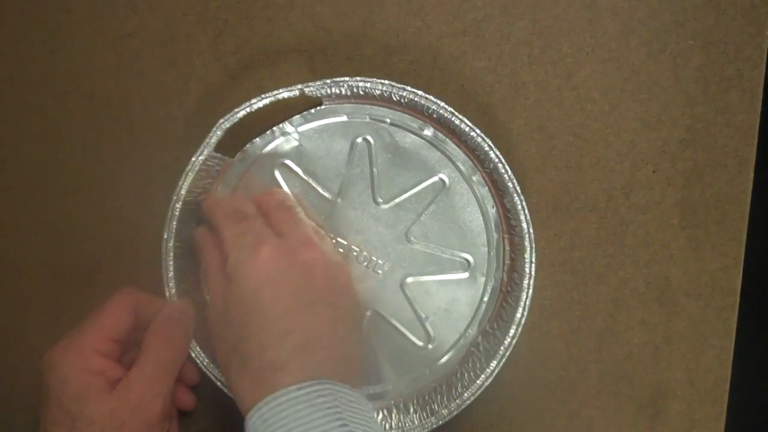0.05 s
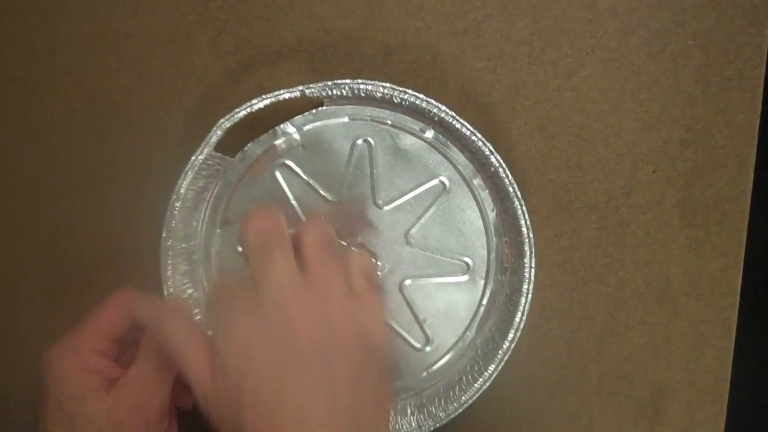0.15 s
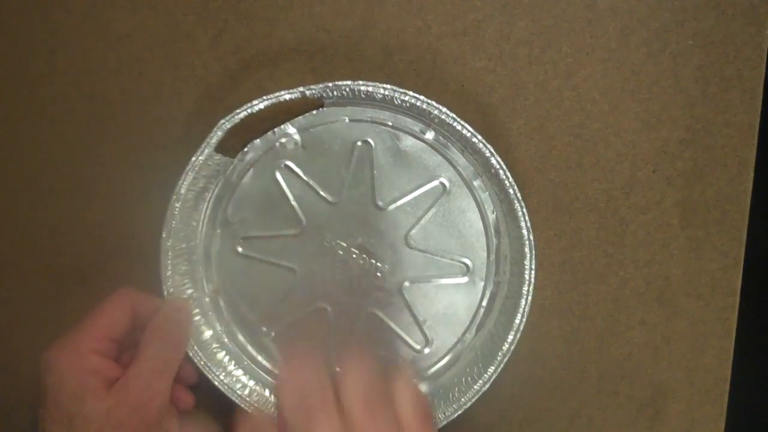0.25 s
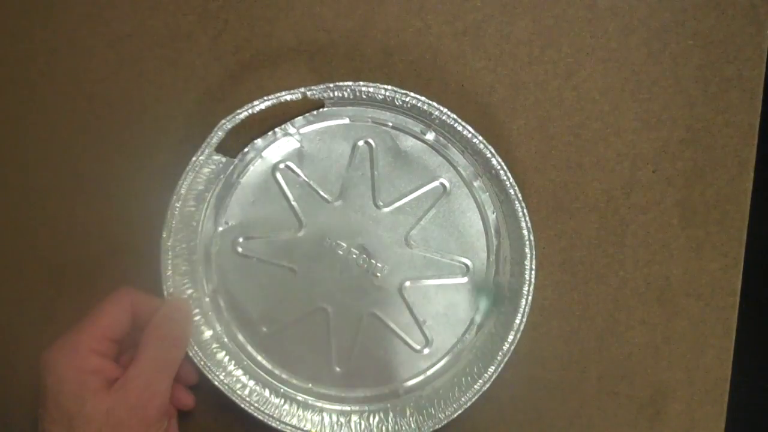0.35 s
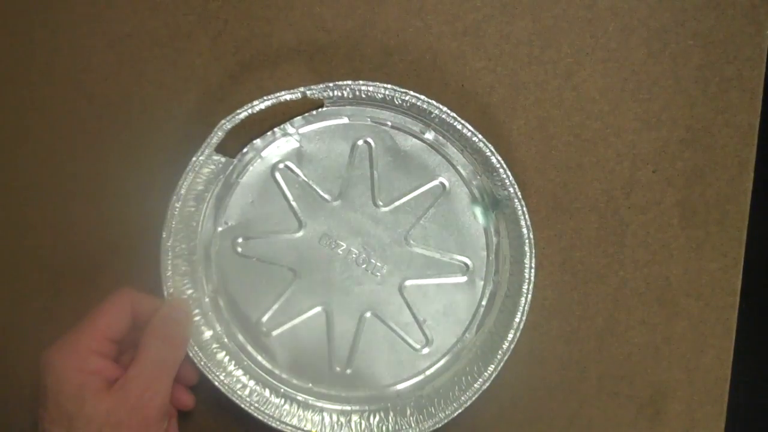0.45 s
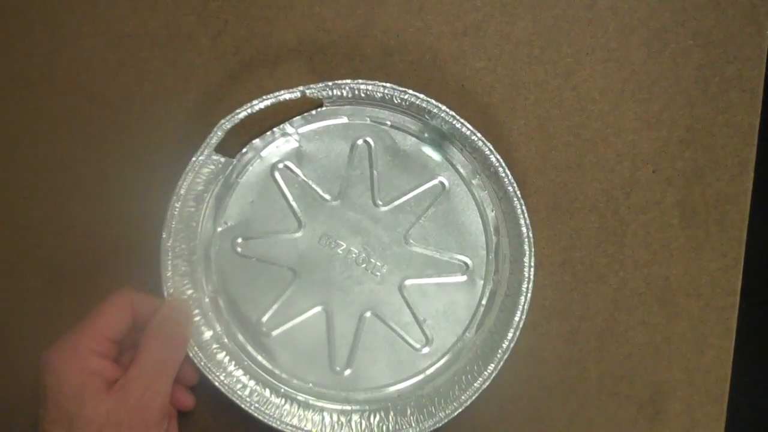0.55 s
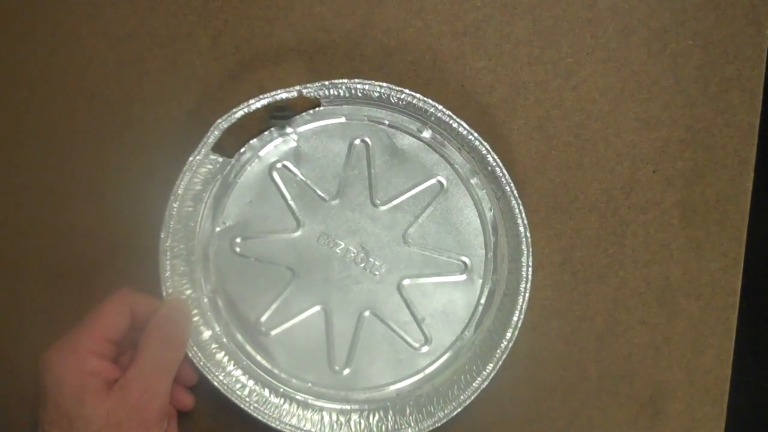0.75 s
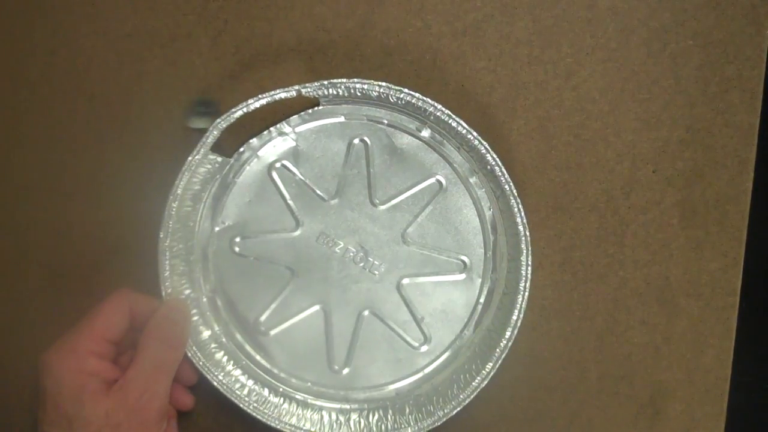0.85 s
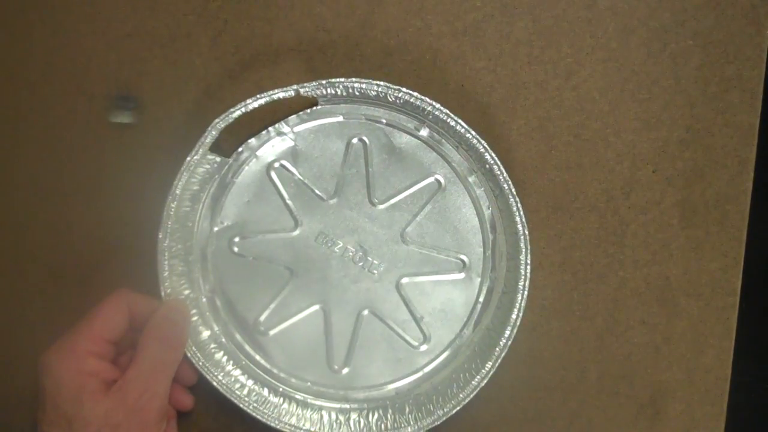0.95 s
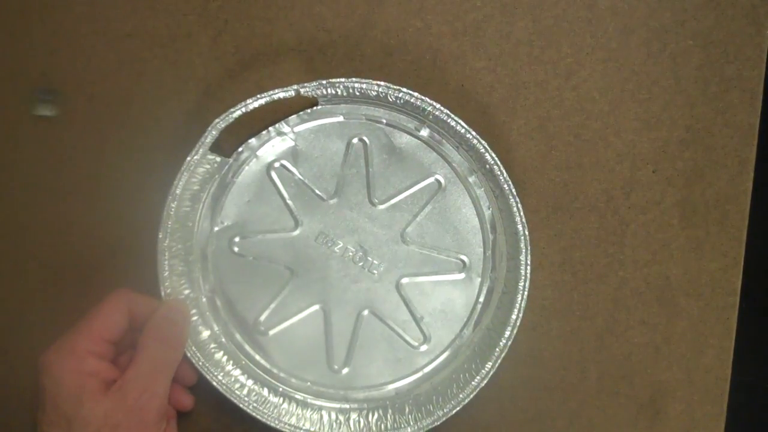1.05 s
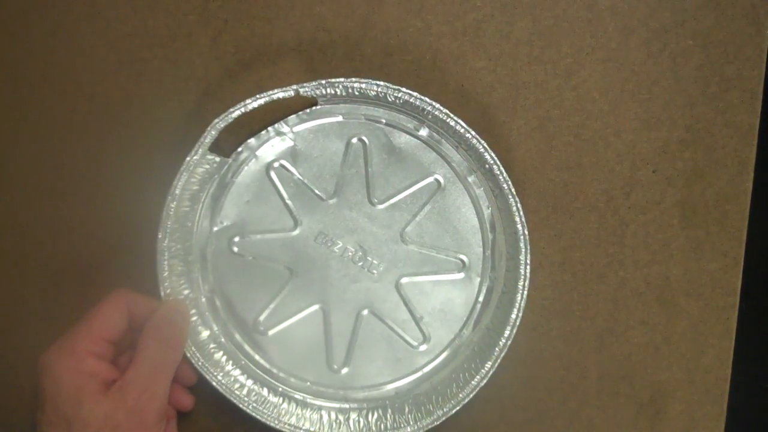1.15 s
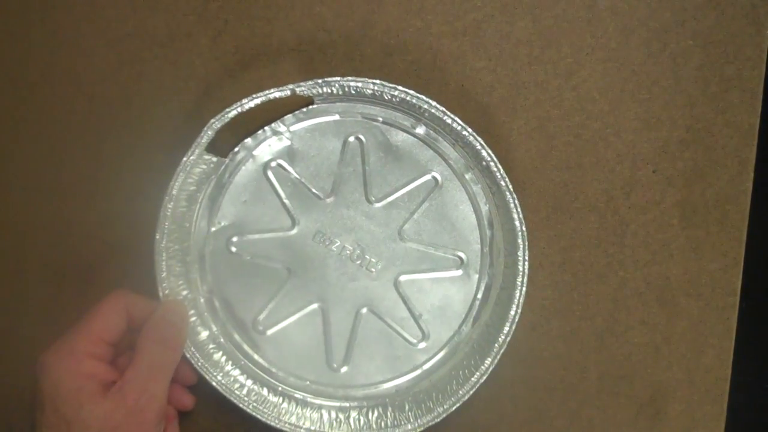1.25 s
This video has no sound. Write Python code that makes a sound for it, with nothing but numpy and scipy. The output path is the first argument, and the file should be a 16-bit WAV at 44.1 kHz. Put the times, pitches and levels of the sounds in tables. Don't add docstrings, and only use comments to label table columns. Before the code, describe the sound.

A glass marble whirls round a thin foil pie plate with a dense tinny rattle and sharp ticks, thins out as it slows, then knocks a hollow tabletop and rolls off quietly in a small room.

```python
import sys
import numpy as np
from scipy import signal
from scipy.fft import rfft, irfft
from scipy.io import wavfile
from scipy.ndimage import uniform_filter1d

SR = 44100
rng = np.random.default_rng(int(sys.argv[2]) if len(sys.argv) > 2 else 0)


def level_to_linear(level):
    exponent = np.asarray(level, float) / 20
    return 10 ** exponent


def unload_audio(sound):
    columns = np.transpose(np.atleast_2d(sound))
    steps = np.round(np.clip(columns, -1, 1) * 32767)
    wavfile.write(sys.argv[1], SR, steps.astype(np.int16))


N = 57330

# start in seconds, rattle length in seconds, level in dB.
RIDGES = [(0.218, 0.0062, -49), (0.2245, 0.0026, -40), (0.2308, .002, -20), (0.2417, 0.0018, -20.5),
          (0.2471, 0.0095, -22.5), (0.255, 0.0051, -20), (0.2636, .003, -17.5), (0.2714, 0.0035, -17),
          (0.2817, 0.0064, -14.5), (0.2892, 0.004, -18.5), (.300, 0.004, -30), (0.3146, 0.0079, -15),
          (0.328, 0.0054, -34), (0.3526, 0.0047, -15.5), (0.36, 0.0034, -25), (0.366, 0.013, -20.5),
          (0.389, 0.0034, -16.5), (0.395, 0.0019, -27.5), (0.413, 0.0063, -20), (0.4215, 0.0062, -24),
          (0.4336, 0.0047, -20.5), (0.444, 0.0051, -32), (0.4562, 0.0073, -21), (0.466, 0.0089, -25),
          (0.4834, 0.002, -19.5), (0.506, 0.0034, -24), (0.52, 0.0084, -22.5), (0.537, 0.0049, -23),
          (0.551, 0.036, -34), (0.596, 0.0022, -36.5), (0.6143, 0.0055, -22.5), (0.624, 0.0015, -31),
          (0.632, 0.0018, -28.5), (0.647, 0.0074, -28), (0.663, 0.0057, -39), (0.693, .004, -34),
          (0.698, 0.0094, -28), (0.741, 0.0097, -30.5), (0.759, .002, -44), (0.799, 0.011, -29.5),
          (0.829, 0.011, -31.5), (0.8566, 0.0053, -30.5), (0.898, 0.0035, -41), (0.916, 0.0056, -38.5),
          (.932, .005, -43)]
# start in seconds, peak in dB.
TICKS = [(.1873, -40), (.2322, -15), (.2540, -14), (.2590, -13), (.2853, -10), (.3155, -14), (.3905, -14),
         (.4250, -15), (.4530, -17), (.5034, -5), (.5110, -15), (.5185, -21), (.5553, -18), (.5573, -18),
         (.5635, -20), (.5655, -21), (.5690, -18), (.5810, -20), (.6020, -19), (.6135, -15), (.6730, -24),
         (.7005, -18), (.7070, -20), (.7693, -20), (.8103, -18), (.8370, -20), (.8608, -16), (.9215, -27)]
# start in seconds, peak in dB, pitch in Hz.
PANELS = [(0.2652, -17, 1915), (0.2825, -5.5, 2018), (0.2974, -13.5, 3130), (0.321, -14.5, 2120),
          (0.357, -31, 3380), (0.372, -14.5, 1375), (0.391, -14.5, 1205), (0.415, -16.5, 1400),
          (0.435, -12.5, 1230), (0.460, -15, 1244), (0.487, -16.5, 1200), (0.526, -16.5, 1250),
          (0.615, -14.5, 1200), (0.650, -14.5, 1257), (0.700, -26, 2275), (0.749, -17.5, 3102),
          (0.806, -22.5, 1220), (0.833, -20, 1246), (0.8595, -17, 3080)]
# start in seconds, peak in dB, pitch in Hz.
MORE_PANELS = [(.232, -18.5, 1940), (0.231, -26, 1080), (0.24, -26.5, 1240), (0.231, -18.5, 2630),
               (.244, -21, 1950), (0.252, -17.5, 984), (.256, -17, 2330), (0.271, -9, 2203),
               (.276, -24, 1390), (.292, -12, 2140), (.296, -20, 1244), (0.324, -18, 1075),
               (.356, -16.5, 1190), (.36, -15, 2100), (0.422, -21, 2080), (.495, -19, 1186),
               (0.536, -24, 1384), (0.257, -15, 1484), (.435, -20, 3010), (0.467, -16, 2130),
               (.506, -24, 3010), (.614, -16.5, 2386), (.70, -25.5, 1150), (0.747, -18.5, 1265),
               (.757, -25, 1330), (.806, -28.5, 3180), (0.701, -24, 3130), (0.662, -24, 1260),
               (.625, -26, 3180), (.749, -20, 2400), (0.768, -26, 3200), (.832, -27.5, 3060),
               (0.86, -22.5, 1230), (0.859, -33, 5370), (.89, -29, 1000), (.915, -29, 1020),
               (.935, -38, 1070)]
# time in seconds, level in dB.
FOIL_ROLL = [
    (.225, -93),
    (.24, -39),
    (.35, -64),
    (.5, -40.5),
    (.6, -34.5),
    (.75, -35.5),
    (.9, -40.5),
    (.94, -40),
    (.95, -70),
    (.96, -90),
]
# frequency in Hz, gain in dB.
FOIL_COLOUR = [(200, -23.5), (500, -19.5), (800, -12), (1200, -2), (2300, -3.5), (4200, -7), (7000, -8.5),
               (13000, -6.5)]
# frequency in Hz, T60 in seconds.
FOIL_T60 = [(300, 0.59), (1300, 0.15), (3000, 0.025), (7000, 0.01), (12000, 0.004)]
# frequency in Hz, gain in dB, T60 in seconds.
RIM_MODES = [(201, -41, 0.026), (308, -23, 0.016), (340, -19, 0.031), (387, -5, 0.032), (534, -12.5, 0.018),
             (628, 2, 0.025)]
# time in seconds, level in dB.
WEIGHT = [(.22, -86), (.25, -45), (.34, -57), (.40, -44.5), (.44, -42), (.475, -37.5), (.50, -49),
          (.54, -40), (.575, -44.5), (.60, -57), (.625, -43), (.69, -54), (.73, -47), (.79, -59),
          (.815, -45.5), (.87, -53.5), (.92, -62)]
# frequency in Hz, dB on landing, T60 in seconds, dB when rolled on.
BOARD_MODES = [(810, -37.5, .015, -46), (1000, -30, 0.015, -33), (1260, -30, 0.17, -2),
               (1249, 13, 0.051, -34), (1333, 22, 0.044, 22.5), (1412, 11.5, 0.053, 20.5),
               (1630, 5, 0.065, 12), (1759, 23, 0.015, 14.5), (1860, -15, .022, -32), (2320, 5.5, 0.026, 3),
               (2550, 9, 0.019, -43), (3230, 8, 0.027, -26), (4400, -3, 0.017, -42)]
# frequency in Hz, level in dB, T60 in seconds.
BOARD_DRUM = (356, -26.5, 0.035)
# time in seconds, level in dB.
TABLE_ROLL = [
    (.952, -90),
    (.960, -23.5),
    (.975, -31),
    (.99, -36.5),
    (1.06, -39),
    (1.12, -39),
    (1.2, -41),
    (1.25, -37.5),
    (1.3, -41),
]
# start in seconds, peak in dB.
HOPS = [(0.985, -33), (.9915, -23.5), (1.0555, -25), (1.063, -30), (1.1039, -31.5), (1.111, -43),
        (1.1464, -29.5), (1.166, -31), (1.172, -26), (1.192, -51), (1.2533, -23), (1.266, -31),
        (1.2824, -42), (1.288, -32)]
# frequency in Hz, gain in dB.
AIR_COLOUR = [(30, -11), (200, 7.5), (500, 4.5), (1400, 6), (2500, 1.5), (4500, -5.5), (8000, -6),
              (14000, -15)]
# frequency in Hz, level in dB.
WHINES = [(1400, -72), (7881, -74), (11806, -76)]
# resonance in Hz, Q, roll-off in Hz.
PORTS = [(7730, 3.95, 12750), (6385, 4.77, 7530)]


def plate():
    return high(foil() + panels(), 294) + ticks() + plate_body()


def foil():
    t = np.arange(N) / SR
    release_s, spot_s, spots = 0.0032, 0.002, 12
    rattle = np.zeros(N)
    for start, hold, db in RIDGES:
        since_hold = np.clip(t - start - hold, 0, 1)
        rattle += level_to_linear(db) * (t >= start) * np.exp(-since_hold / release_s)
    force = (rattle + line(FOIL_ROLL)) * grit(per_s=5000, spread_db=4.5)
    spot = np.repeat(rng.integers(spots, size=N), int(spot_s * SR))[:N]
    out = np.zeros((2, N))
    for k in range(spots):
        force_here = force * (spot == k)
        out += signal.fftconvolve(force_here[None], foil_response())[:, :N]
    return out


def foil_response():
    size = 4096
    t, out = np.arange(size) / SR, 0
    noise = stereo(size)
    for hz in 150 * 2 ** np.arange(0, 7.):
        edges = [hz, min(2 * hz, SR / 2.1)]
        band = signal.sosfilt(signal.butter(2, edges, "band", fs=SR, output="sos"), noise)
        t60 = over_hz(FOIL_T60, hz * np.sqrt(2))
        out = out + band * level_to_linear(-60 * t / t60) / np.sqrt(t60)
    return level(colour(out, FOIL_COLOUR), 0) / np.sqrt(size)


def panels():
    t = np.arange(N) / SR
    push_s, t60, split_hz, gain_db = 0.004, 0.022, 86, -9
    push = grit(per_s=5000, spread_db=2.3)
    out = np.zeros(N)
    for start, db, hz in list(PANELS) + list(MORE_PANELS):
        shove = push * (t >= start) * np.exp(-np.clip(t - start, 0, 1) / push_s)
        ring = mode(shove, hz, t60)
        ring = ring - 0.6 * mode(shove, hz + split_hz, t60)
        ring = ring - 0.5 * mode(shove, hz - 1.1 * split_hz, t60)
        ring = high(ring, hz / 2)
        out += ring * level_to_linear(db + gain_db) / np.abs(ring).max()
    return out


def ticks():
    size = 1024
    out, t = np.zeros((2, N + size)), np.arange(size) / SR
    t60, low_hz, top_hz, gain_db = 0.0072, 2400, 10100, -0.5
    for start, db in TICKS:
        snap = stereo(size) * level_to_linear(-60 * t / t60) + 1.8 * (t == 0)
        snap = signal.lfilter(*signal.butter(1, top_hz, fs=SR), high(snap, low_hz))
        first = int(start * SR)
        out[:, first:first + size] += snap * level_to_linear(db + gain_db) / np.abs(snap).max()
    return out[:, :N]


def plate_body():
    shake = rng.standard_normal(N)
    rim = level(sum(level_to_linear(db) * mode(shake, hz, t60) for hz, db, t60 in RIM_MODES), 0)
    deep = level(rumble(shake + 0.7 * rng.standard_normal((2, N))), -26)
    return line(WEIGHT) * (high(rim, 214) + deep)


def table_top():
    land_s = 0.9526
    return landing(land_s) + table_roll() + hops() + cracks(land_s)


def landing(land_s):
    t = np.arange(N) / SR
    push_s, squash = 0.00021, 2.6
    blow = np.sin(np.pi * np.clip((t - land_s) / push_s, 0, 1))
    knock = radiated(sum(level_to_linear(db) * mode(blow, hz, t60) for hz, db, t60, _ in BOARD_MODES))
    knock = radiated(np.tanh(squash * knock / np.abs(knock).max()))
    return knock * level_to_linear(-2) / np.abs(knock).max()


def table_roll():
    rough = grit(per_s=5900, spread_db=5)
    hz, db, t60 = BOARD_DRUM
    drum = level(high(mode(rough, hz, t60), hz / 2), db)
    hiss = level_to_linear(-25) * radiated(rough)
    return line(TABLE_ROLL) * (level(board(rough), 0) + drum + hiss)


def hops():
    push_s, gain_db = 0.00018, 2.5
    soft = np.hanning(int(push_s * SR) + 3)
    pushes = np.convolve(spikes(HOPS), soft / soft.sum())[:N]
    return board(pushes) * level_to_linear(gain_db) / sum(level_to_linear(row[3]) for row in BOARD_MODES)


def cracks(land_s):
    size, t60 = 2048, 0.022
    crack = high(stereo(size) * level_to_linear(-60 * np.arange(size) / SR / t60), 2600)
    snaps = spikes([(land_s, -20)]) + level_to_linear(-26.5) * spikes(HOPS)
    return signal.fftconvolve(snaps[None], crack)[:, :N]


def board(x):
    return radiated(sum(level_to_linear(db) * mode(x, hz, t60) for hz, _, t60, db in BOARD_MODES))


def radiated(x):
    return high(x, 668)


def room(near):
    size = N // 2
    t = np.arange(size) / SR
    t60, gap_s, low_hz, top_hz = 0.3, 0.0019, 1570, 6200
    noise = rng.standard_normal((2, size))
    tail = level(noise * level_to_linear(-60 * t / t60) * (t > gap_s), -9.5) / np.sqrt(size)
    tail = signal.lfilter(*signal.butter(1, [low_hz, top_hz], "band", fs=SR), tail)
    return signal.fftconvolve(near.mean(axis=0)[None], tail)[:, :N]


def air():
    noise = stereo(N) + 2.0 * rng.standard_normal((2, N))
    return level_to_linear([[1.5], [-1.5]]) * level(colour(noise, AIR_COLOUR), -57.5)


def grit(per_s, spread_db):
    hit, size, sign = rng.random(N), rng.exponential(size=N), rng.standard_normal(N)
    x = (hit < per_s / SR) * np.sign(sign) * level_to_linear(spread_db * np.minimum(size, 3.5))
    return x / np.sqrt(uniform_filter1d(x ** 2, size=256) + 0.017)


def mode(x, hz, t60):
    r, w = np.exp(-np.log(1000) / (t60 * SR)), 2 * np.pi * hz / SR
    return signal.lfilter([0, np.sin(w)], [1, -2 * r * np.cos(w), r * r], x)


def stereo(size):
    mid, side = rng.standard_normal((2, size))
    side = level_to_linear(-3.5) * signal.lfilter(*signal.butter(1, 4440, "high", fs=SR), side)
    return np.array([mid + side, mid - side])


def spikes(rows):
    x = np.zeros(N)
    for s, db in rows:
        x[int(s * SR)] += level_to_linear(db)
    return x


def level(x, db):
    return x * level_to_linear(db) / np.sqrt(np.mean(x ** 2))


def line(table):
    s, db = np.array(table).T
    return level_to_linear(np.interp(np.arange(N) / SR, s, db))


def over_hz(table, hz):
    f, v = np.array(table).T
    return np.interp(np.log(np.maximum(hz, 1)), np.log(f), v)


def colour(x, table):
    size = x.shape[-1]
    return irfft(rfft(x) * level_to_linear(over_hz(table, np.fft.rfftfreq(size, 1 / SR))), size)


def high(x, hz):
    return signal.sosfilt(signal.butter(4, hz, "high", fs=SR, output="sos"), x)


def rumble(x):
    hz = 55.4
    return signal.sosfilt(signal.butter(2, [hz / 2, hz * 2.1], "band", fs=SR, output="sos"), x)


def scene():
    near = plate() + table_top()
    return near + room(near) + air()


def ports(dry):
    out = []
    for x, (hz, q, top_hz) in zip(dry, PORTS):
        w = 2 * SR * np.tan(np.pi * hz / SR)
        x = signal.lfilter(*signal.bilinear([w * w], [1, w / q, w * w], SR), x)
        out.append(signal.lfilter(*signal.butter(2, min(top_hz, SR / 2.1), fs=SR), x))
    out[0] = np.append(out[0][0], out[0][:-1])
    return np.array(out)


def gate_top(mic):
    mirrored = np.hstack([mic, mic[:, ::-1]])
    top = irfft(rfft(mirrored) * (np.fft.rfftfreq(2 * N, 1 / SR) > 14250), 2 * N)[:, :N]
    bright = np.abs(high(mic[0], 3000))
    before = np.roll(uniform_filter1d(bright, size=400), 240)
    attack = uniform_filter1d(bright, size=64) > level_to_linear(17) * before
    held = uniform_filter1d(1. * attack, size=256) > 1e-6
    gate = uniform_filter1d(1. * held, size=128)
    return mic - top * (1 - gate)


def top_cut(x):
    return signal.sosfilt(signal.butter(12, 16470, fs=SR, output="sos"), x)


def record(dry):
    t = np.arange(N) / SR
    whine = sum(level_to_linear(db) * np.sqrt(2) * np.sin(2 * np.pi * hz * t) for hz, db in WHINES)
    hiss = level_to_linear(-63) * rng.standard_normal((2, N))
    mix = gate_top(ports(dry) + whine + hiss)
    return top_cut(mix)


dry = scene()
out = record(dry)
unload_audio(out)
```